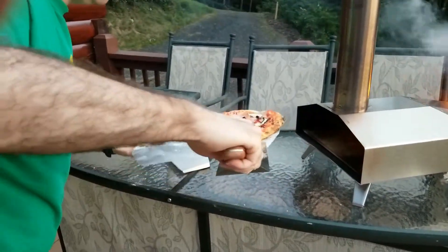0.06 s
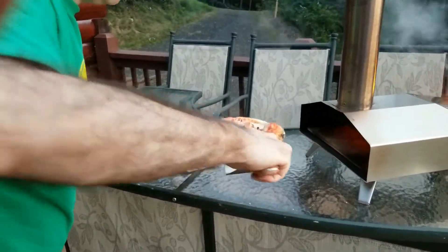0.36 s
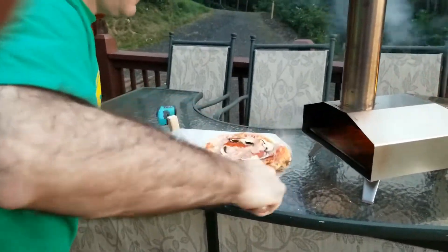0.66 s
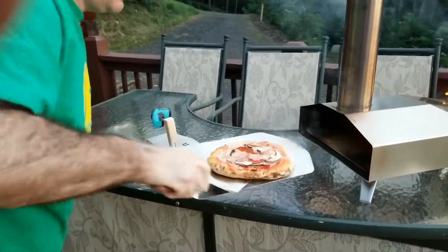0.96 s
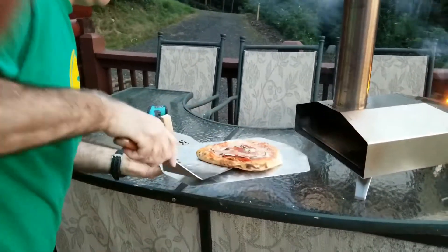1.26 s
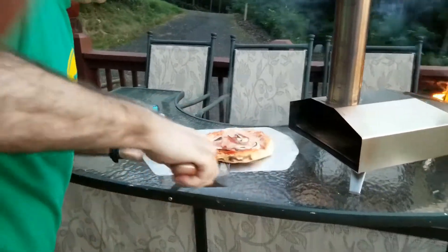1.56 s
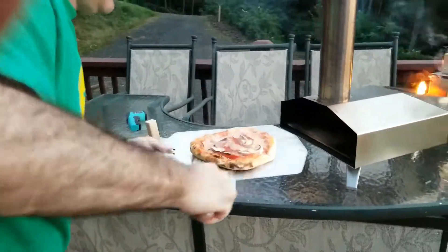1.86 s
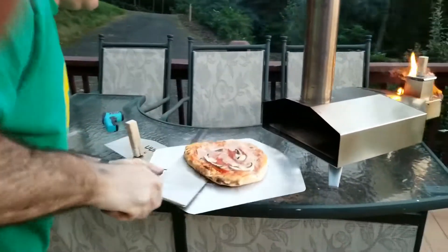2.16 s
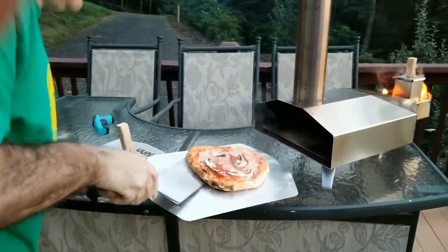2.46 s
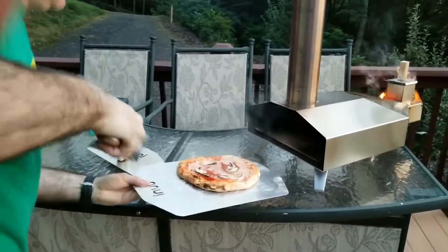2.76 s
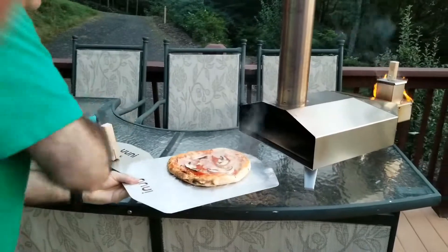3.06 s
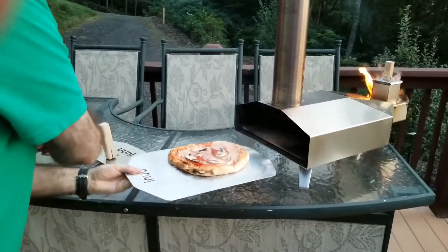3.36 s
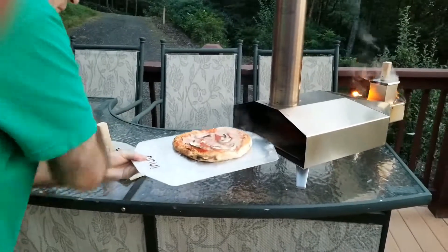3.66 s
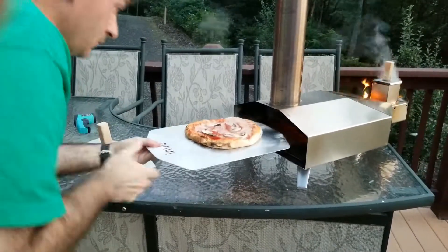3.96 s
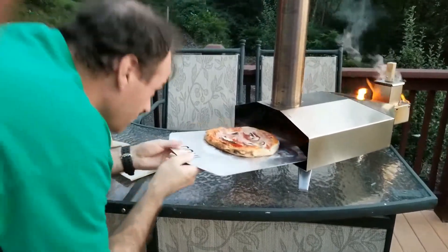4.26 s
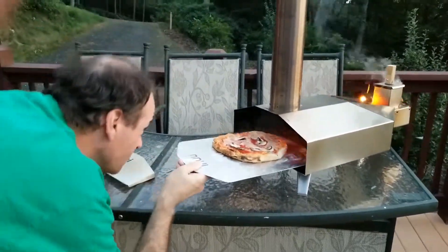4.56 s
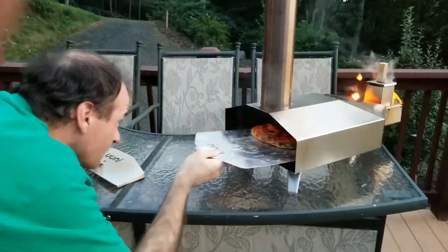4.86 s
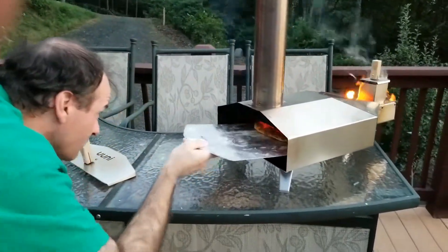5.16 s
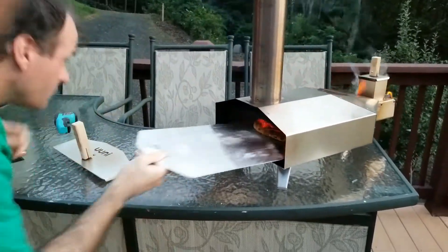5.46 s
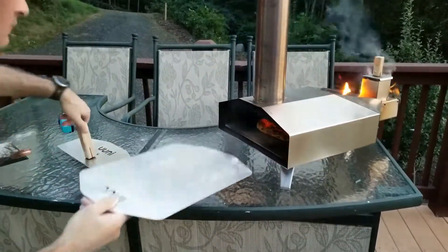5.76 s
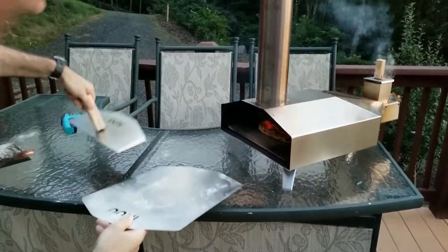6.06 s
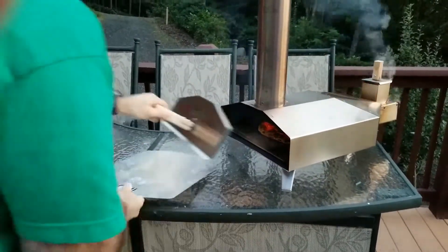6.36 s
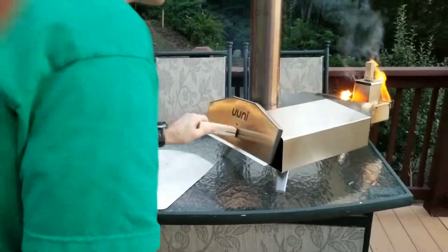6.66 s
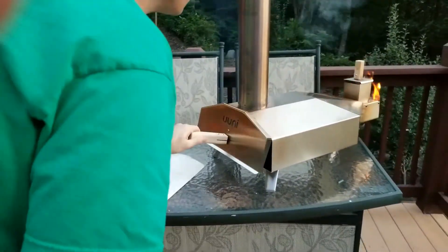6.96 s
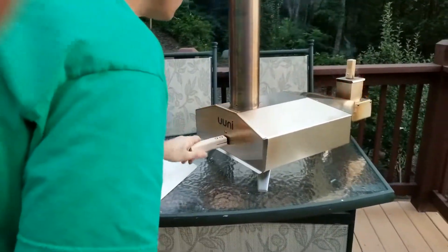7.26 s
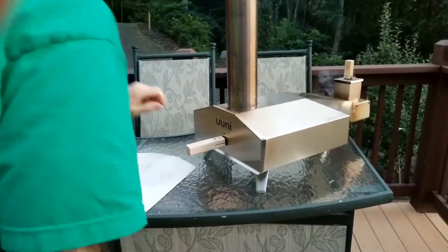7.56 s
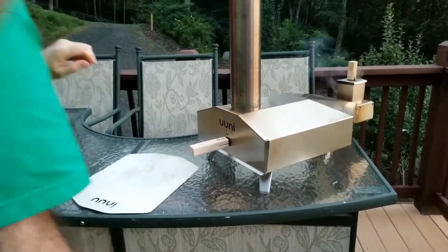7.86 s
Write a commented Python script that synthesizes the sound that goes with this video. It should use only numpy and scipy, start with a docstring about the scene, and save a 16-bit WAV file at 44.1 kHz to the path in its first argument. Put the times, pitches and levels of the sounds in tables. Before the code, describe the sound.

For the first 2.7 seconds a thin metal blade scrapes across a pizza peel in short pushes, close by, with light taps, a brief squeal near 1.3 seconds and a small ping at 2.6. At 3.6 seconds the peel clatters on a glass-topped table, the loudest sound, leaving a low ringing boom and a few smaller knocks. From 4.2 to 5.5 seconds it slides in and out of a small oven with a hissing metallic rasp, then lands lightly on the table around 5.9. From 6.2 seconds the steel oven door scrapes and knocks into place, with a strong clang at 6.8, several smaller knocks and a last sharp clang at 7.2. A faint bump follows near 7.9. Throughout, a fire rumbles softly and crickets trill faintly in the trees beyond the deck.

```python
"""Close by, a metal blade scrapes in short pushes, easing a pizza onto a peel; it squeals and pings.
We are on a deck at dusk, a stereo microphone near a small steel oven on a glass-topped table.
The peel clatters on the table and is shuffled in and out of the oven; the door is knocked into place.
Scrapes are edges catching and slipping; knocks chatter and set steel and table ringing.
The fire rumbles softly underneath, and farther off crickets trill in the trees."""
import sys
import numpy as np
from scipy import signal
from scipy.fft import rfft, irfft, next_fast_len
from scipy.io import wavfile

SR = 44100
rng = np.random.default_rng(int(sys.argv[2]) if len(sys.argv) > 2 else 0)


def unload_wav(signal):
    """Save mono or channel-first audio to the path in sys.argv[1] as 16-bit WAV at rate SR, clipped to [-1, 1]."""
    wavfile.write(
        sys.argv[1],
        SR,
        np.round(np.clip(np.atleast_2d(signal).T, -1, 1) * 32767).astype(np.int16),
    )


N = 358091
TIME = np.arange(N) / SR


def from_db(db):
    """Decibels to gain."""
    return 10 ** (np.asarray(db) / 20)


def rms_one(x):
    """Scale to rms 1."""
    return x / np.sqrt(np.mean(x ** 2) + 1e-20)


def at_hz(points, hz):
    """Read a spectrum on a log-frequency axis."""
    freqs, values = np.array(points).T
    return np.interp(np.log(hz), np.log(freqs), values)


def band(x, low, high, order=2):
    """Band-pass, edges in Hz."""
    sos = signal.butter(order, [low, min(high, .45 * SR)], "band", fs=SR, output="sos")
    return signal.sosfilt(sos, x + 1e-18)


def drift(turns_per_s):
    """A random wander with a spread of about 1."""
    return np.interp(TIME * turns_per_s, np.arange(4096), rng.standard_normal(4096))


def add(out, s, sound):
    """Mix a sound in at time s."""
    start = max(round(s * SR), 0)
    out[..., start:start + sound.shape[-1]] += sound[..., :N - start]


# How alike the microphone's two channels are: (frequency [Hz], correlation [0-1])
LIKENESS = [(30, 0.7), (80, 0.96), (200, 0.9), (500, 0.82), (1000, 0.33), (2500, 0.14), (16000, 0)]
# Lean to the left at the microphone: (frequency [Hz], left minus right [dB])
BALANCE = [(60, 0), (400, 1.5), (1200, 0), (2400, 2.5), (5000, 0.5), (15000, 3)]
def coloured(sources, spectrum, ranges):
    """Two white sources become one stereo layer per range, rms 1; the channels agree in the bass only."""
    size = next_fast_len(N, real=True)
    hz = np.maximum(np.fft.rfftfreq(size, 1 / SR), 1)
    mid, side = rfft(sources, size)
    alike, left_right = at_hz(LIKENESS, hz), np.array([[1], [-1]])
    stereo = np.sqrt(1 + alike) * mid + np.sqrt(1 - alike) * side * left_right
    stereo *= from_db(at_hz(spectrum, hz) + left_right * at_hz(BALANCE, hz) / 2)
    rolloffs = [np.sqrt((1 + (low / hz) ** 8) * (1 + (hz / high) ** 8)) for low, high in ranges]
    return [rms_one(irfft(stereo / rolloff, size)[:, :N]) for rolloff in rolloffs]


def air(level_db=-76):
    """A faint even hiss all around the deck."""
    return from_db(level_db) * rms_one(band(rng.standard_normal((2, N)), 500, 16220, order=1))


def trees(chorus, t60=0.7):
    """The trees scatter a distant sound on its way to the microphone."""
    t = TIME[:SR // 2]
    echoes = rng.standard_normal((2, len(t))) * from_db(-60 * t / t60)
    echoes /= np.linalg.norm(echoes, axis=1, keepdims=True)
    echoes[0, 0] = echoes[1, 5] = 0.36   # direct sound, reaching the left first
    return signal.oaconvolve(chorus[None], echoes, axes=1)[:, :N] * from_db([[-.5], [-1.5]])


# Choruses off in the trees:
# (pitch [Hz], spread [Hz], level [dB], wing strokes [1/s], slowest chirp rate [1/s])
CRICKETS = [(2032, 58, -62, 37, 2.5), (2136, 71, -69.5, 53, 3.1), (2530, 65, -71.5, 66, 0.59),
            (4590, 170, -75, 26, 3.8), (5180, 190, -76.5, 36, 1.6)]
def crickets(pulse_depth=0.9, insects=5):
    """Each insect is a wavering tone, pulsed by its wing strokes and swelling in chirps."""
    chorus, turn = np.zeros(N), 2 * np.pi * TIME
    for hz, spread_hz, db, strokes, chirps in CRICKETS:
        voices = np.zeros(N)
        for detune in np.linspace(-1, 1, insects):
            wings = 1 + pulse_depth * np.sin(turn * strokes * rng.uniform(0.99, 1.0))
            chirp = 1 + 0.59 * np.sin(turn * chirps * rng.uniform(1.0, 1.3) + rng.uniform(0, 2 * np.pi))
            pitch = hz + spread_hz * (detune + .7 * drift(140))
            voices += chirp * wings * np.sin(2 * np.pi / SR * np.cumsum(pitch))
        chorus += from_db(db) * rms_one(voices)
    return chorus


# Low spectrum of the nearby fire and table: (frequency [Hz], relative level [dB])
RUMBLE_COLOUR = [(25, -8.5), (50, -10.5), (72, 3), (120, -4.5), (180, -9), (300, -21), (480, -27),
                 (650, -26), (1000, -34), (2500, -52)]
def rumble(envelope):
    """Deep noise that follows an envelope."""
    return envelope * coloured(rng.standard_normal((2, N)), RUMBLE_COLOUR, [(20.6, 2000)])[0]


def fire(level_db=-66, flicker_db=1.5):
    """The fire rumbles in the oven, flickering slightly."""
    return rumble(from_db(level_db + flicker_db * drift(3.6)))


def stored(force, t60):
    """Energy held in a body that is fed by the force and loses 60 dB in t60 seconds."""
    return signal.lfilter([1], [1, -from_db(-60 / (t60 * SR)) ** 2], force ** 2 + 1e-18)


def table_boom(thuds, gain_db=-28.5, t60=2):
    """The table booms on after each thud."""
    return rumble(from_db(gain_db) * np.sqrt(stored(thuds, t60)))


def table_drone(flexing, gain_db=-6):
    """The table drones under the flexing sheet."""
    return rumble(from_db(gain_db) * flexing)


def ring(force, hz, t60):
    """One mode: a unit tap starts a dying sine of rms 1, with a different phase in each channel."""
    decay, step = from_db(-60 / (t60 * SR)), 2 * np.pi * hz / SR
    swing = signal.lfilter([1], [1, -2 * decay * np.cos(step), decay ** 2], force + 1e-18)
    apart = np.arccos(at_hz(LIKENESS, hz)) * rng.choice([-1, 1]) / 2
    shifts = [[np.sin(phase), decay * np.sin(step - phase)] for phase in (apart, -apart)]
    return np.sqrt(2) * np.array([np.convolve(swing, shift)[:N] for shift in shifts])


def slips(per_s, uneven_db, size):
    """Random tiny contacts of uneven strength and either sign."""
    contacts = (rng.random(size) < per_s / SR) * rng.choice([-1, 1], size)
    return contacts * from_db(uneven_db * np.minimum(rng.exponential(1, size), 4))


def pushes(rows, drop_db=22.5, swell_shape=1.8, fade_shape=1.61):
    """Strength of flexing, rasp and hiss: each push of the hand speeds up to its peak, then slows."""
    power = np.zeros((3, N))
    for peak_s, swell_s, fade_s, *levels_db in rows:
        t = TIME[(TIME > peak_s - 2 * swell_s) & (TIME < peak_s + 2 * fade_s)] - peak_s
        slowness = np.where(t < 0, np.abs(t / swell_s) ** swell_shape, np.abs(t / fade_s) ** fade_shape)
        strength = from_db(levels_db)[:, None] * from_db(-drop_db * slowness)
        add(power, peak_s + t[0], strength ** 2)
    return np.sqrt(power)


# Thin steel singing under every scrape: (frequency [Hz], relative level [dB], t60 [s])
SHEET_MODES = [(719, -5.5, 0.018), (1420, -18, 0.03), (2320, -15, 0.061), (3450, -18.5, 0.11),
               (7880, -9.5, 0.005), (12500, -15, 0.0048)]
def scrape(strengths, colour, slips_per_s, uneven_db, judder_db, modes_db):
    """An edge catches and slips thousands of times a second; the sheet's modes come and go."""
    ranges_hz = [(300, 1150), (1150, 6200), (6200, 17000)]   # flexing, rasp, edge hiss
    pressure = from_db(judder_db * drift(90))
    grit = rms_one(slips(slips_per_s, uneven_db, (2, N)))
    out = np.zeros((2, N))
    for friction, (low, high), strength in zip(coloured(grit, colour, ranges_hz), ranges_hz, strengths):
        drive = pressure * strength
        out += drive * friction
        for hz, db, t60 in SHEET_MODES:
            if low <= hz < high:
                build_up = np.sqrt(t60 * SR / np.log(1e6))   # steady rubbing piles up energy in a mode
                out += ring(grit[0] * drive * drift(7), hz, t60) * from_db(db + modes_db) / build_up
    return out


def blows(rows, touches_per_s, first_touch):
    """Force of thud, clang and crack: a first touch, then a chatter of rebounds that swells and dies."""
    force, t = np.zeros((3, N)), TIME[:SR // 4]
    for s, *levels_db, chatter_s in rows:
        touches = slips(touches_per_s, 4.6, len(t)) * t / chatter_s * np.exp(-t / chatter_s)
        touches /= np.linalg.norm(touches) + 1e-12
        touches[0] = first_touch * np.exp(-chatter_s / 0.0043)   # a flat, slow landing starts softly
        add(force, s, from_db(levels_db)[:, None] * touches / np.linalg.norm(touches))
    return force


# Registers of thud, clang and crack: (low edge [Hz], high edge [Hz])
REGISTERS = [(55, 450), (450, 3500), (3500, 17000)]
# Shudder of the deck furniture in each register: (t60 [s])
SHUDDER_T60 = [0.83, 0.47, 0.41]
def struck(forces, colour, modes, t60, shudder_db, modes_db, tick_db):
    """Each touch ticks; crowded modes die fast, a shudder lingers, single modes ring, the table booms."""
    out = table_boom(thuds=forces[0])
    crowds = coloured(rng.standard_normal((2, N)), colour, REGISTERS)
    for force, crowd, (low, high), shudder_t60 in zip(forces, crowds, REGISTERS, SHUDDER_T60):
        shudder = from_db(shudder_db) ** 2 * stored(force, shudder_t60)
        out += crowd * np.sqrt(stored(force, t60) + shudder)
        out += from_db(tick_db) * band(force, low, high) * np.sqrt(SR / 2 / (high - low))
        for hz, db, ring_s in modes:
            if low <= hz < high:
                out += from_db(db + modes_db) * ring(force, hz, ring_s)
    return out


# Peel and door sliding at the oven mouth, close by:
# (peak time [s], swell [s], fade [s], flexing [dB], rasp [dB], edge hiss [dB])
PEEL_PUSHES = [(4.245, 0.0032, 0.26, -70, -73, -56), (4.306, 0.0033, 0.04, -72, -63.5, -48),
               (4.6, 0.12, 0.11, -71.5, -71.5, -56.5), (4.7, 0.09, 0.085, -57, -51.5, -47.5),
               (4.85, 0.2, 0.12, -52.5, -47, -43), (5.0, 0.072, 0.092, -64, -57.5, -50.5),
               (5.061, 0.0092, 0.14, -63, -48.5, -47.5), (5.12, 0.083, .08, -56, -51, -49),
               (5.225, 0.04, 0.072, -57, -51.5, -46.5), (5.32, 0.057, 0.091, -55.5, -49.5, -45),
               (5.39, .09, 0.17, -50.5, -46.5, -41), (5.475, 0.064, 0.028, -63, -48, -36)]
DOOR_PUSHES = [(6.243, .002, 0.098, -70, -54, -50), (6.312, .004, 0.26, -60.5, -52, -52.5),
               (6.47, 0.076, 0.11, -73, -48.5, -52), (6.59, 0.13, 0.15, -48, -45.5, -81)]
# Spectrum of scraping in the oven: (frequency [Hz], relative level [dB])
OVEN_COLOUR = [(200, 14.5), (380, -3), (680, 2), (950, -4.5), (1300, -1), (2000, 5.5), (2700, 2.5),
               (4000, -2), (7700, -9.5), (9000, -12.5), (12500, -3.5), (15000, 2), (16000, -9.5)]
def oven_scrapes():
    """Steel rubs on stone and steel as the peel goes in and out and the door slides home."""
    peel, door = pushes(PEEL_PUSHES), pushes(DOOR_PUSHES)
    out = scrape(peel, OVEN_COLOUR, slips_per_s=5000, uneven_db=2.0, judder_db=1.07, modes_db=-3.0)
    out += scrape(door, OVEN_COLOUR, slips_per_s=5500, uneven_db=2.5, judder_db=0.8, modes_db=1.5)
    return out + table_drone(flexing=peel[0])


# Door on the oven mouth, close by: (time [s], thud [dB], clang [dB], crack [dB], chatter [s])
DOOR_KNOCKS = [(6.241, -48, -40.5, -52, 0.0057), (6.309, -52, -51.5, -56, 0.0021),
               (6.448, -76, -55, -49, 0.0054), (6.521, -52, -37, -53, 0.0029),
               (6.556, -43.5, -38, -44, 0.00089), (6.578, -41.5, -40.5, -66, 0.029),
               (6.776, -24, -21.5, -26, 0.0074), (6.868, -29, -34.5, -51, 0.013),
               (6.92, -25.5, -34.5, -33.5, 0.0054), (6.955, -35, -35.5, -51, 0.0074),
               (7.015, -37, -45, -46, 0.0015), (7.043, -30, -33.5, -39.5, 0.0051),
               (7.085, -31.5, -41.5, -51, 0.0075), (7.235, -30.5, -26.5, -25, 0.004),
               (7.37, -46.5, -67, -65, 0.0092)]
# The door's crowded modes: (frequency [Hz], relative level [dB])
DOOR_COLOUR = [(40, -35), (70, -25.5), (170, 2.5), (290, 0), (480, -9.5), (600, 0), (790, -4), (920, -2),
               (2600, -6), (3200, -13.5), (7700, -16.5), (9000, -23), (12500, -18), (16000, -23)]
# Its clear modes: (frequency [Hz], relative level [dB], t60 [s])
DOOR_MODES = [(164.7, -9.5, 0.53), (199.7, -12, 0.35), (231.4, -13, 0.53), (342, -9.5, 0.45),
              (617, -12, 0.34), (683, -16, 0.34), (785.5, -8, 0.22), (1027, -14, 0.14), (1218, -14, 0.33),
              (2000, -11, 0.32), (2644, -8.5, 0.28), (4100, -12, 0.18), (5440, -21, 0.15),
              (6390, -11, 0.28), (8140, -5.5, 0.082)]
def door_knocks():
    """The steel door clangs as it is knocked into place."""
    forces = blows(DOOR_KNOCKS, touches_per_s=1200, first_touch=2.0)
    return struck(forces, DOOR_COLOUR, DOOR_MODES, t60=0.16, shudder_db=-18.5, modes_db=-3.5, tick_db=10)


# Peel on the table, near the microphone, and two light steel ticks at the oven mouth (4.242 s, 4.304 s): (time
# [s], thud [dB], clang [dB], crack [dB], chatter [s])
PEEL_KNOCKS = [(3.61, -19.5, -11.5, -24, 0.018), (3.917, -36, -48, -52, 0.0061),
               (3.945, -35.5, -37.5, -47.5, 0.013), (4.1, -44.5, -79, -80, 0.018),
               (4.242, -52.5, -69.5, -68, 0.0036), (4.304, -57, -61.5, -57.5, 0.0037),
               (5.795, -63, -50, -68.5, 0.01), (5.875, -56, -42.5, -47, 0.0065),
               (5.897, -57, -43.5, -52, 0.0063), (5.927, -44.5, -33, -57, 0.004),
               (5.945, -34.5, -35.5, -45.5, 0.0092), (6.03, -46, -69, -68, 0.0093),
               (7.88, -57, -91, -82, 0.025)]
# The table's crowded modes: (frequency [Hz], relative level [dB])
TABLE_COLOUR = [(30, -28.5), (60, -7.5), (140, 4), (330, -3.5), (480, -3), (850, -1), (1000, -2),
                (1400, -4), (2700, -5.5), (3500, -15.5), (5000, -20), (7800, -23.5), (9300, -31.5),
                (16000, -28)]
# Its clear modes: (frequency [Hz], relative level [dB], t60 [s])
TABLE_MODES = [(71.65, -20.5, 1.0), (113.8, -17, .8), (137, -13, 0.62), (168, -18.5, 0.55),
               (196.4, -11, 0.7), (334, -11, 0.41), (542, -20, 0.21), (866, -29, 0.37), (1344, -15, 0.17),
               (2150, -18.5, 0.38), (2370, -17, 0.31), (2590, -23, 0.24)]
def peel_clatter():
    """The peel lands and rebounds, shaking the glass-topped table; steel ticks lightly at the oven mouth."""
    forces = blows(PEEL_KNOCKS, touches_per_s=870, first_touch=1.8)
    return struck(forces, TABLE_COLOUR, TABLE_MODES, t60=0.14, shudder_db=-13, modes_db=-1, tick_db=9)


# Blade on the peel, near the microphone: (time [s], thud [dB], clang [dB], crack [dB], chatter [s])
BLADE_TAPS = [(0.09, -64, -60, -54, 0.0044), (0.314, -41.5, -45, -56, 0.0084),
              (0.355, -53, -37, -43, 0.012), (0.884, -49, -62, -66, 0.021), (0.958, -43.5, -62, -72, 0.018),
              (1.072, -50, -47, -58, 0.0067), (1.102, -42, -39.5, -68, 0.0014),
              (1.38, -40.5, -66, -63, 0.0093), (1.43, -46, -45.5, -59, 0.0093),
              (1.495, -59, -51, -67, 0.001), (2.243, -43.5, -38, -45, 0.0035),
              (2.64, -48, -48.5, -62, 0.0014), (2.707, -52, -67, -72, 0.002), (2.746, -52, -63, -76, 0.006),
              (2.785, -53, -69, -80, 0.0046)]
# Crowded modes of blade and peel: (frequency [Hz], relative level [dB])
TAP_COLOUR = [(50, -9.5), (170, 9.5), (330, -2), (480, -4), (720, -3), (950, -9.5), (1400, -9),
              (3000, -15.5), (8000, -20), (16000, -19)]
# Their clear modes: (frequency [Hz], relative level [dB], t60 [s])
TAP_MODES = [(301, -8.5, 0.3), (705, -22, 0.19), (1365, -13, 0.061)]
def blade_taps():
    """The blade bumps the peel, and both ring briefly."""
    forces = blows(BLADE_TAPS, touches_per_s=1100, first_touch=1.3)
    return struck(forces, TAP_COLOUR, TAP_MODES, t60=0.067, shudder_db=-20.5, modes_db=-5, tick_db=-1)


def blade_squeal(peak_s=1.28, half_width_s=0.1, hz=1420, level_db=-53.5, t60=0.035):
    """Pressed hard, the sliding blade briefly excites one bending mode."""
    pressure = np.exp(-((TIME - peak_s) / half_width_s) ** 2)
    return from_db(level_db) * pressure * rms_one(ring(slips(3000, 2.2, N), hz, t60))


def blade_ping(start_s=2.64, hz=1630, level_db=-62, t60=0.72):
    """The blade slips off the peel and rings free on one clear mode."""
    out, t = np.zeros(N), TIME[:SR]
    add(out, start_s, np.sin(2 * np.pi * hz * t) * from_db(level_db - 60 * t / t60))
    return out


# Blade sliding under the pizza, near the microphone:
# (peak time [s], swell [s], fade [s], flexing [dB], rasp [dB], edge hiss [dB])
BLADE_PUSHES = [(0.2, 0.11, 0.28, -89, -55.5, -52.5), (0.36, 0.15, 0.2, -56.5, -46, -57),
                (0.63, 0.081, 0.12, -78, -57.5, -58.5), (0.685, 0.11, 0.043, -88, -69, -50.5),
                (0.785, .02, .08, -82, -75, -70), (1.03, 0.068, 0.25, -55, -55, -58),
                (1.2, 0.077, 0.11, -57, -50, -54), (1.28, 0.081, 0.12, -57.5, -47.5, -55),
                (1.38, 0.088, 0.17, -56, -55, -54), (1.55, .13, 0.13, -56.5, -54, -56.5),
                (1.74, 0.095, 0.15, -63.5, -52.5, -54), (1.98, 0.25, 0.43, -67, -61.5, -64),
                (2.15, 0.092, 0.17, -64.5, -56, -55.5), (2.37, 0.11, 0.17, -65, -54.5, -55.5),
                (2.51, 0.074, 0.092, -60, -51, -55.5), (2.61, 0.15, 0.056, -65, -60, -48.5)]
# Spectrum of its scraping: (frequency [Hz], relative level [dB])
BLADE_COLOUR = [(200, -6.5), (450, -9.5), (700, -8.5), (1000, -13.5), (1400, -4), (1750, -3), (2400, 0.5),
                (4200, -6), (6500, -10.5), (8000, -7.5), (9400, -14), (12500, -6.5), (16000, -14.5)]
def blade_scrapes():
    """The thin blade flexes and rasps across the peel in short pushes."""
    blade = pushes(BLADE_PUSHES)
    out = scrape(blade, BLADE_COLOUR, slips_per_s=6000, uneven_db=2.0, judder_db=1.24, modes_db=1.5)
    return out + table_drone(flexing=blade[0])


def scene():
    """From the table side: crickets and fire behind; door, peel and blade in front."""
    background = air() + trees(crickets()) + fire()
    loading = oven_scrapes() + door_knocks() + peel_clatter()
    blade = blade_taps() + blade_squeal() + blade_ping() + blade_scrapes()
    return background + loading + blade


def record(dry, cutoff_hz=16000):
    """The microphone signal is cut steeply at the top."""
    return signal.sosfilt(signal.ellip(12, .2, 80, cutoff_hz, fs=SR, output="sos"), dry)


dry = scene()
out = record(dry)
unload_wav(out)
```